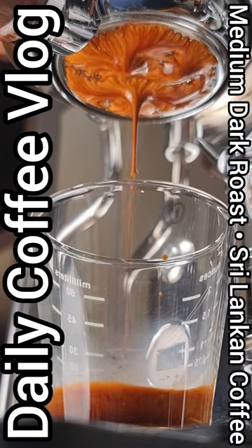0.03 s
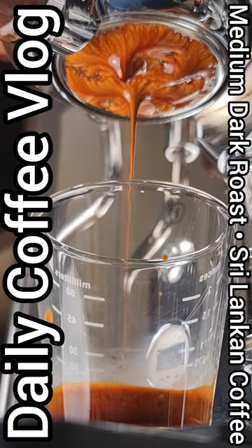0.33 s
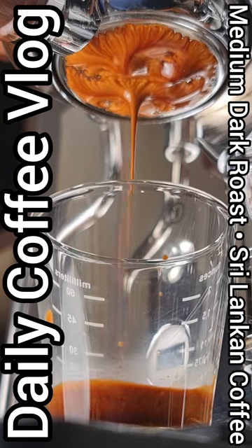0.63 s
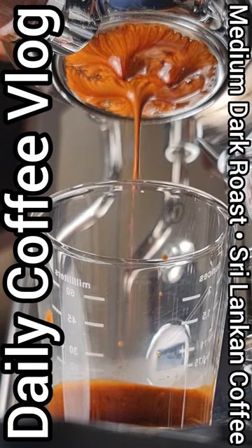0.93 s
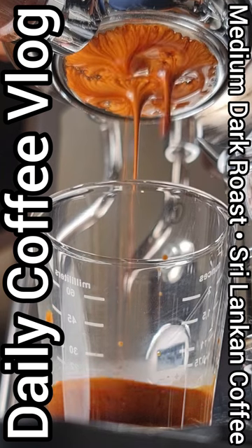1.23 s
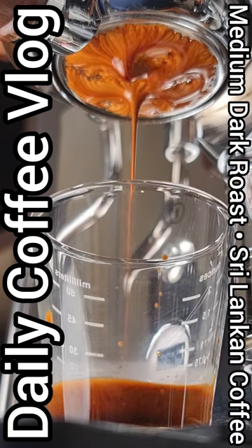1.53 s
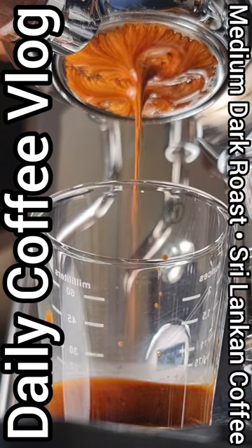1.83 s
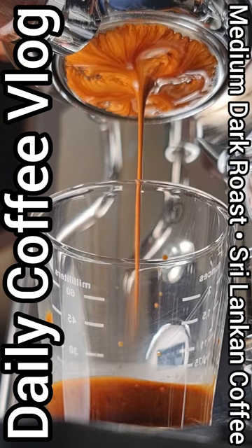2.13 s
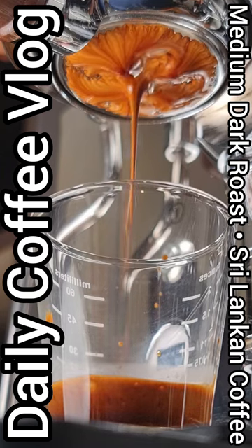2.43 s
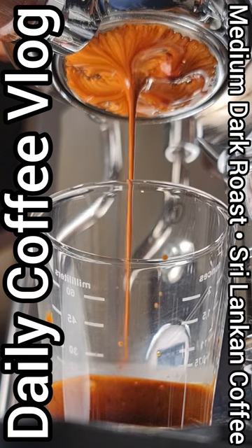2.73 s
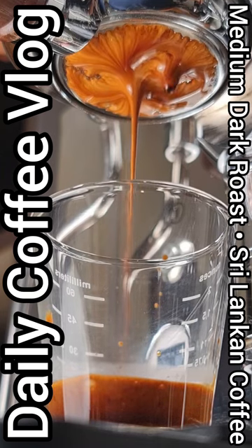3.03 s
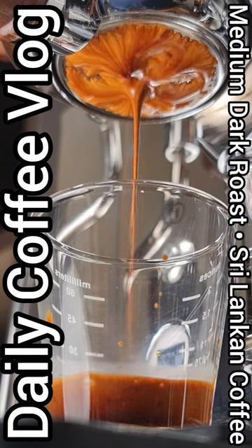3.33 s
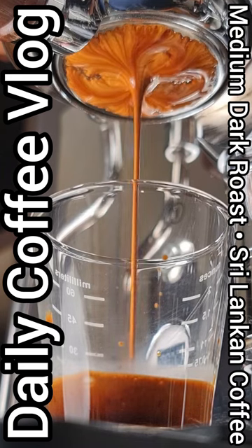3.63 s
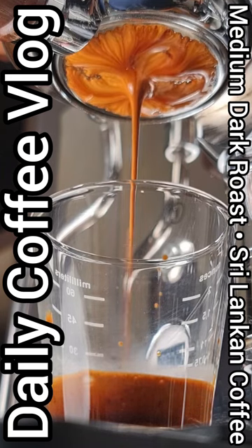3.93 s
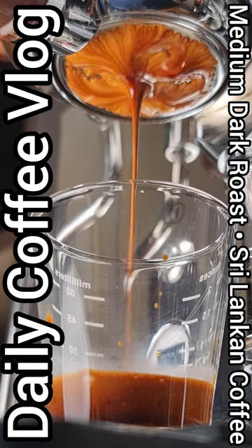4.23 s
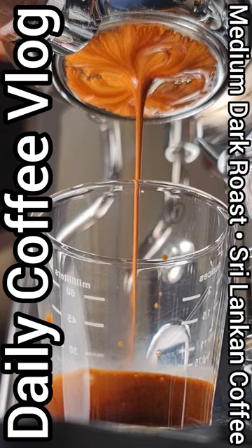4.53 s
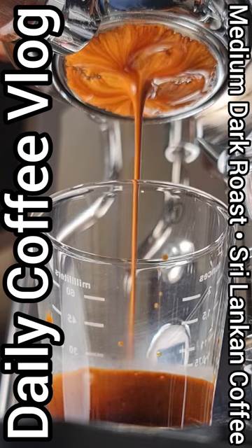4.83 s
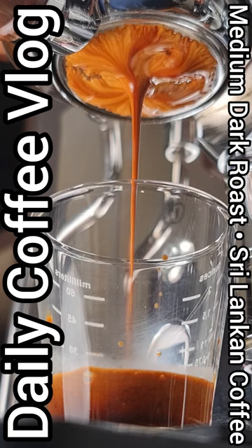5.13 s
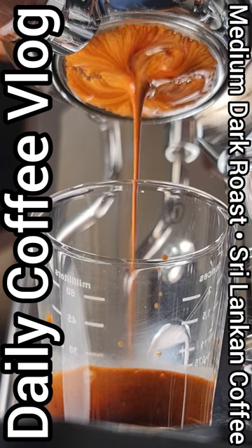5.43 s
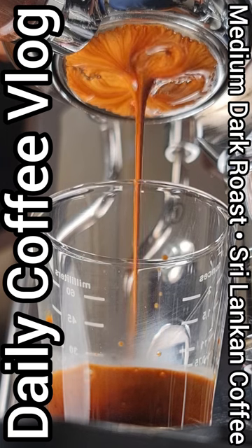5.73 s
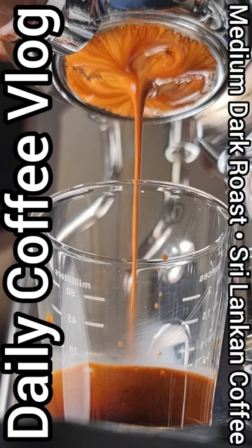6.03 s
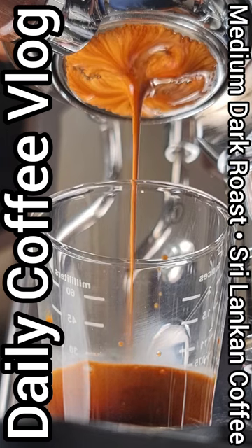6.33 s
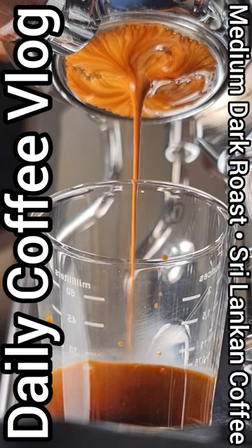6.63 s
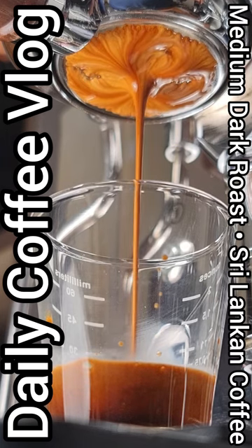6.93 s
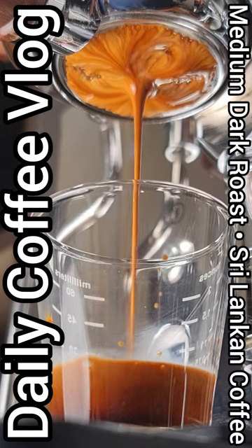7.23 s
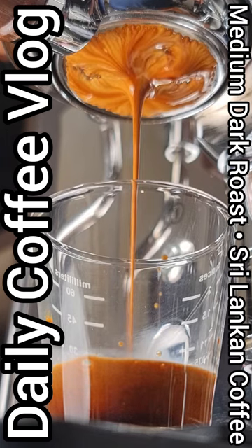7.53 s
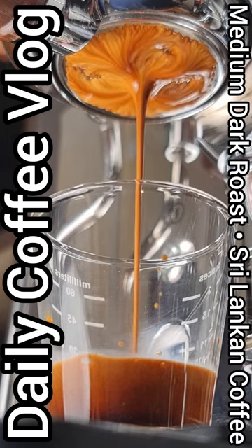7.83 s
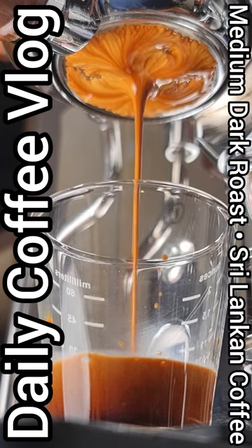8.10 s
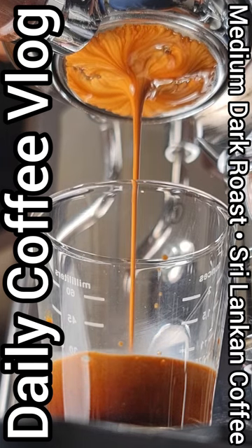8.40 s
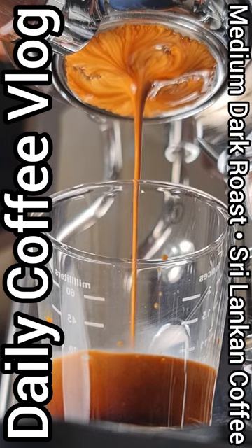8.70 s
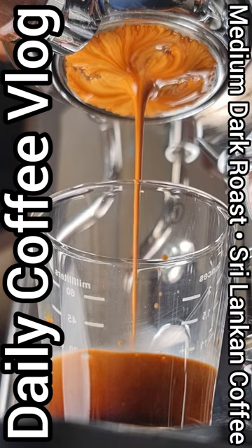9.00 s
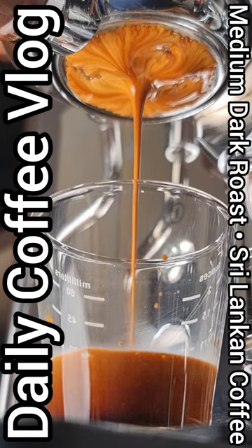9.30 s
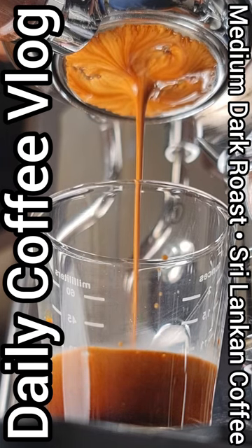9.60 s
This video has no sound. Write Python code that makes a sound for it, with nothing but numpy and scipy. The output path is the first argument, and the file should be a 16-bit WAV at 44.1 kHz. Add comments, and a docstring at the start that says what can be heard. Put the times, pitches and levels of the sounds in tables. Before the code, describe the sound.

Separate drops of coffee plop into a glass, and now and then a bubble pops with a sharp click. Midway the dripping thickens into a trickle that gradually deepens in pitch, joined by a fine crackle of froth and more clicks. Throughout, heard from close by, the espresso machine keeps up an even low hum with a light pump rasp, a faint whine and a gritty hiss of water.

```python
"""An espresso machine pulls a shot, close by. From start to end its motor hums, a four-vane rotary pump
rasps and whines, and water hisses through the pressure valve, swelling twice with each turn of the shaft.
At first coffee drips into a glass with separate plops, and now and then a bubble bursts with a sharp click.
About halfway the drips join into a stream and a fine crackle builds up.
As the frothy layer deepens, it rings lower and the clicks get duller."""
import sys
import numpy as np
from scipy import signal
from scipy.fft import rfft, irfft, next_fast_len
from scipy.io import wavfile
from scipy.ndimage import map_coordinates

SR = 44100
rng = np.random.default_rng(int(sys.argv[2]) if len(sys.argv) > 2 else 0)


def log_audio(samples):
    """Write samples as a 16-bit WAV file to the path given in sys.argv[1]."""
    # one column per channel
    frames = np.atleast_2d(samples).T
    # limit to full scale, then quantise
    limited = np.clip(frames, -1, 1)
    pcm = np.round(limited * 32767).astype(np.int16)
    wavfile.write(sys.argv[1], SR, pcm)


N = 430416

# how hard each of the pump's four vanes pushes: relative level/dB
VANE_PUSHES = [4, 1, 1, 0.5]
DRIP_OCTAVES = 0.21  # small plops ring this far above the froth's own note


def pour(drips_per_s=16, doubling_s=2.5):
    """Coffee falls in single large plops over a thickening stream of small ones."""
    # large drops landing: t/s, peak level/dB, bubble f/Hz, relative ring of the glass/dB
    large_drops = [(0.155, -24, 966, 6), (0.524, -27.5, 980, -18), (0.727, -27, 870, -22),
                   (0.78, -18.5, 1040, 3), (1.016, -30, 783, -15), (1.227, -25, 1030, 1),
                   (1.309, -19, 780, -11), (1.399, -15, 970, -24), (1.531, -24.5, 1050, -13),
                   (2.008, -16.5, 789, -14), (2.342, -23.5, 708, -25), (2.717, -26, 725, -26),
                   (2.862, -25, 676, -8), (2.905, -23.5, 651, -16), (2.97, -22, 681, -36),
                   (3.298, -26.5, 685, -23), (3.366, -27.5, 630, -22), (3.411, -22.5, 818, -16),
                   (3.506, -23, 630, -30), (3.793, -22, 604, -24), (3.863, -21, 587, -9),
                   (4.229, -24.5, 593, -27), (4.566, -17.5, 585, -18), (4.604, -27, 568, -22),
                   (4.697, -21, 590, -15), (4.872, -18.5, 580, -15), (4.893, -18, 570, -18),
                   (4.929, -19, 564, -20), (5.436, -18.5, 549, -15), (6.024, -21.5, 503, -11),
                   (6.715, -24.5, 458, -21), (7.124, -25, 616, -16), (8.461, -22, 600, -8)]
    # small drops, largest as they join into a stream: t/s, typical peak/dB, relative ring of the glass/dB
    small_drops = [(0, -34, 0), (2.3, -38, -8), (4.3, -37.5, -11), (4.9, -31, -9), (6, -34.5, -4),
                   (7.4, -38.5, -3.5), (9.76, -42.5, 1.5)]
    out = np.zeros(N)
    for s, db, hz, glass_db in large_drops:
        froth = froth_hz(s)
        add(out, s, amp(db) * plop(hz, glass_db + 9.5, froth))  # the first impact rings the glass harder
        shed_s = s + rng.uniform(.009, .026)  # then the drop sheds a smaller bubble
        add(out, shed_s, amp(db - 11.5) * plop(2 ** DRIP_OCTAVES * froth, glass_db, froth))
    times = chance(drips_per_s * 2 ** (clock() / doubling_s))
    for s, (size, pitch) in zip(times, rng.standard_normal((len(times), 2))):
        db, glass_db = curves(small_drops, s)
        hz = froth_hz(s) * 2 ** (DRIP_OCTAVES + 0.16 * pitch)
        add(out, s, amp(db + 5 * min(size, 2)) * plop(hz, glass_db, froth_hz(s)))
    return out


def plop(bubble_hz, glass_db, layer_hz):
    """A drop traps a bubble that rings briefly and sets the froth and the air in the glass ringing."""
    # notes of the air in the glass: f/Hz, relative level/dB, ring time/s
    air_notes = [(1023, -1.5, 0.026), (1320, -2, 0.019), (1430, -10.5, 0.037)]
    layer = amp(-11) * ring(layer_hz, t60=.11)
    # the air note nearest the froth's overtone (its higher note) loses least
    overtone_hz = 2.62 * layer_hz
    octaves_apart = np.log2(np.array(air_notes)[:, 0] / overtone_hz)
    nearness = np.exp(-(octaves_apart / .2) ** 2)
    loss_db = 11 * (nearness.max() - nearness)
    air = sum(amp(db - loss + rng.normal(0, 2.7)) * ring(hz, t60)
              for (hz, db, t60), loss in zip(air_notes, loss_db))
    sound = ring(bubble_hz, t60=0.02) + amp(glass_db) * air + layer
    # the froth gives off little below its own note, and the soft landing makes little treble
    sound = bandpass(sound, low_hz=.68 * layer_hz, high_hz=1980)
    return echoed(sound / np.max(np.abs(sound)), wet_db=-8, t60=0.057)


def froth_hz(s, start_hz=992, growth_per_s=0.1502):
    """The froth's own note at time s: the layer deepens steadily, and twice the depth halves the pitch."""
    return start_hz / (1 + growth_per_s * s)


def bursting_bubbles(crackle_start_s=4.5, crackle_rise_s=.9, crackles_per_s=48):
    """Loud bursts click and ring the froth and the glass; a finer crackle joins once the stream runs."""
    # loud bubble bursts: t/s, base level/dB
    loud_bursts = [(0.78, -22), (1.016, -22.5), (1.2276, -25), (1.3085, -19.5), (2.9052, -19), (3.299, -21),
                   (4.6954, -23.5), (4.7331, -20), (4.8954, -21), (5.02, -18), (5.1023, -19.5),
                   (5.7593, -20), (5.8153, -19), (6.322, -18.5), (6.3582, -19), (6.4273, -19),
                   (6.5675, -22.5), (6.7666, -18), (7.5632, -17.5), (7.6816, -22.5), (8.1405, -22.5),
                   (8.5909, -17), (8.8055, -19), (9.1192, -21), (9.3682, -21)]
    out = np.zeros(N)
    for s, db in loud_bursts:
        add(out, s, amp(db + 2) * burst(s))
        hollow_ring = plop(2 ** DRIP_OCTAVES * froth_hz(s), glass_db=4.5, layer_hz=froth_hz(s))
        add(out, s, amp(db - 10.5) * hollow_ring)
    build_up = 1 - np.exp(-np.maximum(clock() - crackle_start_s, 0) / crackle_rise_s)
    for s in chance(crackles_per_s * build_up):
        add(out, s, amp(rng.normal(-28, 2.5)) * burst(s))
    return out


def burst(s):
    """One bubble bursts at time s with a tiny snap; the thickening froth takes off its treble."""
    # the notes in one snap: f/Hz, relative level/dB, ring time/s
    snap_notes = [(1900, -11.5, 0.0043), (2900, -16, 0.0034), (4430, -2, 0.0063), (5430, -3, 0.0022),
                  (6640, 3, 0.0033), (8700, -5.5, 0.0019)]
    pitch = np.exp(rng.normal(0, 0.012))
    treble_db_per_octave = 10 - 1.4 * s
    snap = 0
    for k, (hz, db, t60) in enumerate(snap_notes):
        treble_db = treble_db_per_octave * max(np.log2(hz / 4400), 0)
        gain = amp(db + treble_db + rng.normal(0, 4.1))
        snap += (-1) ** k * gain * ring(hz * pitch, t60, size=SR // 90)
    return echoed(snap / np.max(np.abs(snap)), wet_db=-6.5, t60=.035)


def pump(shaft_hz=24.236):
    """One shaft, turning at a nearly steady speed, sets the pace of the rasp, the hiss and the whine."""
    turns = np.cumsum(shaft_hz * (1 + 0.0006063 * wobble(6))) / SR
    return amp(-39.5) * casing_rasp(turns, shaft_hz) + amp(-42) * valve_hiss(turns) + pump_whine(turns)


def casing_rasp(turns, shaft_hz):
    """Every vane scrapes past the same opening and rings the metal casing."""
    # notes of the metal casing: f/Hz, width/Hz, relative level/dB
    casing_notes = [(1750, 55, -30), (2021, 180, -21), (2467, 156, -11.5), (2680, 160, -8.5),
                    (2948, 240, -11.5), (4153, 360, -11.5), (5376, 380, -11), (6437, 53, 1.5),
                    (6600, 45, -2.5), (6780, 220, -1.5), (7060, 100, -2.5), (7567, 175, 2), (7810, 44, 4),
                    (7870, 135, -1.5), (8680, 75, 1.5), (9410, 32, -1), (10300, 45, -3.5),
                    (11510, 43, -7.5), (12870, 95, -7), (14340, 220, -19)]
    strokes = turns * len(VANE_PUSHES)
    surface = rng.standard_normal(int(SR / shaft_hz / len(VANE_PUSHES)))
    scrape = unit(map_coordinates(surface, [strokes % 1 * len(surface)], mode="grid-wrap"))
    push = vane_push(strokes)
    force = (0.59 * scrape + rng.standard_normal(N)) * push
    casing = lambda f: sum((-1) ** k * amp(db) * 1j * f * width / (hz * hz - f * f + 1j * f * width)
                           for k, (hz, width, db) in enumerate(casing_notes))
    return unit(filtered(force, casing))


def vane_push(strokes, steady=0.35, fade_strokes=.24, scatter_db=1.46):
    """Each vane uncovers the opening suddenly and its push dies away; no two pushes are equal."""
    count = strokes.astype(int)
    scatter = rng.standard_normal(count[-1] + 1)[count]
    size_db = np.take(VANE_PUSHES, count, mode="wrap") + scatter_db * scatter
    return steady + amp(size_db) * np.exp(-(strokes % 1) / fade_strokes)


def valve_hiss(turns, swell_db=2.5, uneven_db=0.7, lag_turns=0.083):
    """A gritty jet of water through the valve swells twice a turn, one swell stronger than the other."""
    # tone colour of the jet: f/Hz, relative level/dB
    hiss_colour = [(1500, -16.5), (3300, -13.5), (4800, -20.5), (6200, -16.5), (6500, 2.5), (7200, -4),
                   (7700, 1), (8200, -6.5), (9000, -9.5), (10500, -5), (12000, -13), (13200, -13),
                   (15000, -13.5), (16000, -32)]
    grit = amp(2.8 * wobble(1500))
    angle = 2 * np.pi * (turns - lag_turns)  # lags behind the strongest vane's push
    swell = amp(swell_db * np.cos(2 * angle) + uneven_db * np.cos(angle))
    return coloured(rng.standard_normal(N) * swell * grit, hiss_colour)


def pump_whine(turns):
    """The pump sings at multiples of its shaft speed, each tone fluttering with the load."""
    # tones of the whine: multiple of the shaft speed, level/dB
    whine_tones = [(20, -53), (21, -60), (25, -58), (28, -60), (32, -55), (39, -58), (40, -60), (42, -60),
                   (43, -56), (44, -59), (56, -62), (64, -66), (72, -64), (80, -68), (84, -63), (88, -69),
                   (99, -66), (100, -61), (102, -66), (104, -61), (108, -61), (112, -55), (120, -65),
                   (124, -65), (128, -65), (168, -68)]
    out = np.zeros(N)
    for multiple, db in whine_tones:
        gain = amp(db + 1.9 * wobble(14))
        # tones at multiples of the vane rate keep step with the pushes
        offset = rng.random() * (1 if multiple % len(VANE_PUSHES) else 1 / 3)
        out += gain * np.sin(2 * np.pi * (multiple * turns + offset))
    return np.sqrt(2) * out


def motor(mains_hz=50):
    """Magnetism tugs the iron twice per mains cycle; the spinning rotor adds tones and shakes the housing."""
    # magnetic hum of the motor and the valve coil: f/Hz, level/dB
    hum_tones = [(100, -34.5), (200, -48.5), (300, -42), (400, -50), (500, -79), (600, -56.5)]
    # motor tones that slip out of step with the mains: f/Hz, level/dB
    rotor_tones = [(87.9, -55.5), (97, -56.5), (224.1, -52), (281.6, -63), (290.8, -51.5), (297, -54.5),
                   (315.1, -58), (387.8, -62), (567.1, -57.5)]
    # tone colour of the shaking housing: f/Hz, relative level/dB
    rumble_colour = [(25, -22), (45, -15), (70, 3.5), (110, 6), (140, -8), (250, -9), (295, 2.5),
                     (345, -8.5), (430, -1.5), (700, -4), (880, -7.5), (1050, -8.5), (2200, -22.5),
                     (5000, -19.5), (16000, -51)]
    t = clock() - .002 + .00003 * wobble(1.0)  # the pitch wavers very slightly
    hum = sum(-amp(db) * np.cos(2 * np.pi * mains_hz * round(hz / mains_hz) * t) for hz, db in hum_tones)
    rotor = sum(amp(db) * np.sin(2 * np.pi * (hz * t + rng.random())) for hz, db in rotor_tones)
    rumble = amp(-43.5) * coloured(rng.standard_normal(N), rumble_colour)
    return np.sqrt(2) * (hum + rotor) + rumble


def ring(hz, t60, size=SR // 15):
    """A note, size samples long, that fades by 60 dB in its ring time of t60 seconds."""
    t = np.arange(size) / SR
    return np.sin(2 * np.pi * hz * t) * np.exp(-np.log(1000) * t / t60)


def echoed(sound, wet_db, t60):
    """A short sound with its own tail of echoes off nearby surfaces."""
    t = np.arange(SR // 15) / SR
    tail = rng.standard_normal(len(t)) * np.exp(-np.log(1000) * t / t60) * (t > .002)
    tail *= amp(wet_db) / np.linalg.norm(tail)
    tail[0] = 1  # the direct sound
    return signal.fftconvolve(sound, tail)


def bandpass(x, low_hz, high_hz):
    """Cut the bass and the treble of a short sound steeply."""
    s = 1j * np.fft.rfftfreq(len(x), 1 / SR)
    poles = lambda hz: (s / hz) ** 2 + np.sqrt(2) * s / hz + 1
    response = (s / low_hz) ** 2 / poles(low_hz) / poles(high_hz)
    return irfft(rfft(x) * response ** 2, len(x))


def filtered(x, response):
    """Scale each frequency in x by response(hz)."""
    size = next_fast_len(N + SR // 2)
    return irfft(rfft(x, size) * response(np.fft.rfftfreq(size, 1 / SR)), size)[:N]


def coloured(x, points):
    """Give x the tone colour of (f/Hz, level/dB) points, at an average strength of 1."""
    f, db = np.transpose(points)
    return unit(filtered(x, lambda hz: amp(np.interp(np.log(hz + 1), np.log(f), db))))


def wobble(rate):
    """A random curve of average strength 1 that heads for a new value rate times a second."""
    points = rng.standard_normal(int(N * rate / SR) + 4)
    return unit(np.interp(clock() * rate, np.arange(len(points)), points))


def chance(per_second):
    """Random moments, in seconds, at a changing rate."""
    return np.flatnonzero(rng.random(N) < per_second / SR) / SR


def curves(rows, at):
    """Read a table's columns at a given time, gliding between its rows."""
    times, *columns = np.transpose(rows)
    return [np.interp(at, times, column) for column in columns]


def add(track, s, sound):
    """Mix a sound into a track at s seconds."""
    part = track[max(round(s * SR), 0):][:len(sound)]
    part += sound[:len(part)]


def amp(db):
    """Turn decibels into a gain."""
    return 10 ** (np.asarray(db) / 20)


def unit(x):
    """Scale to an average strength (rms) of 1."""
    return x / np.sqrt(np.mean(x ** 2) + 1e-20)


def clock():
    """The time of each sample in seconds."""
    return np.arange(N) / SR


def scene():
    """The machine and the glass, heard from one spot."""
    return (motor() + pump() + pour() + bursting_bubbles())[None]


def record(dry):
    """Cut off the very highest treble."""
    return filtered(dry[0], lambda hz: hz < 15720)[None]


dry = scene()
out = record(dry)
log_audio(out)
```